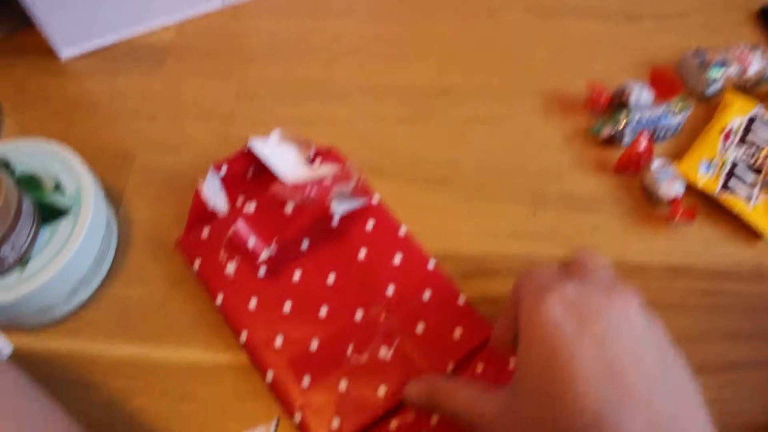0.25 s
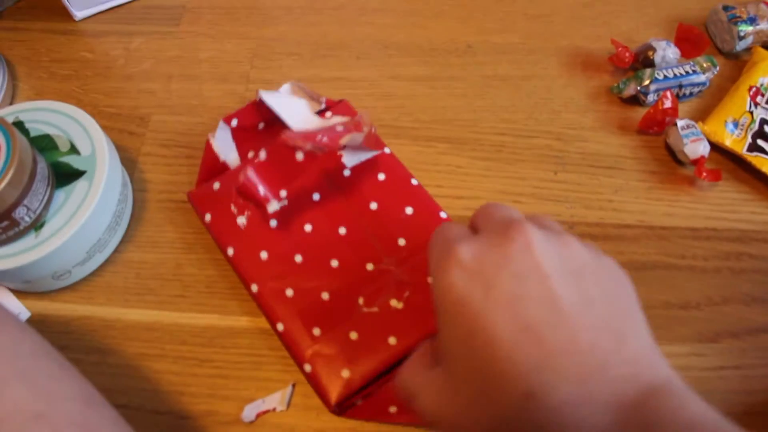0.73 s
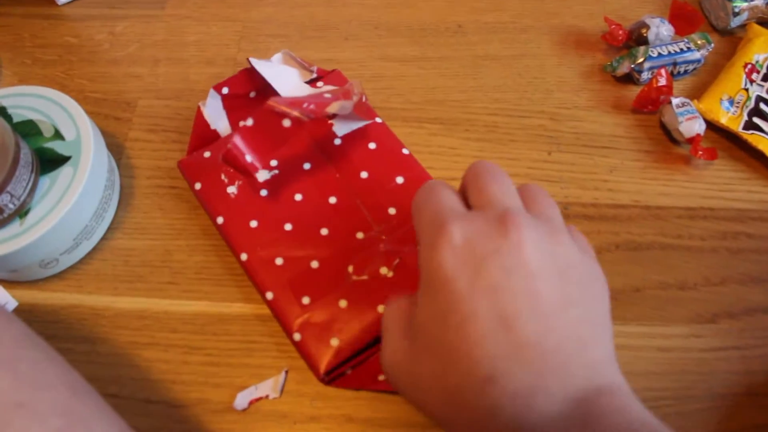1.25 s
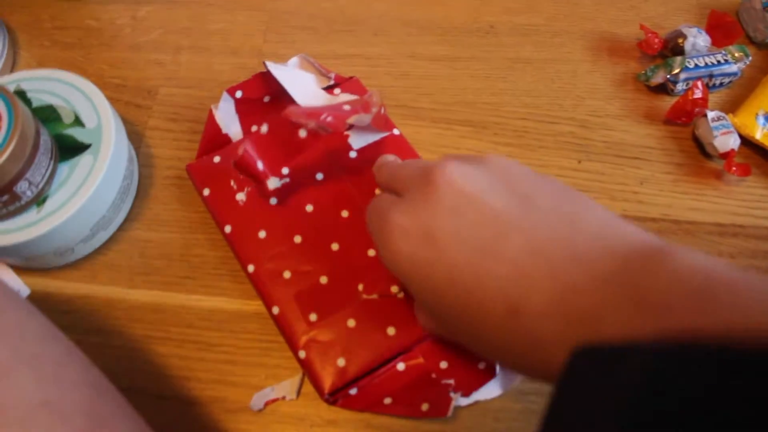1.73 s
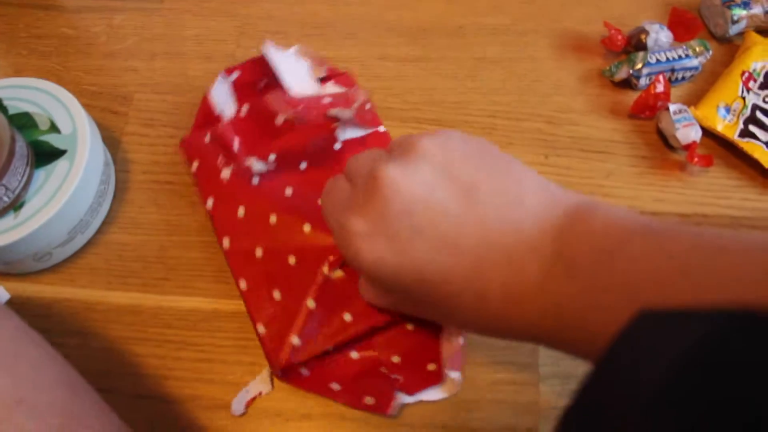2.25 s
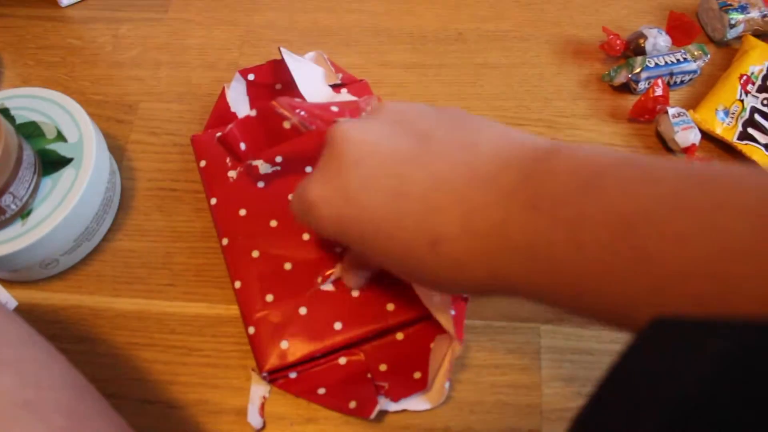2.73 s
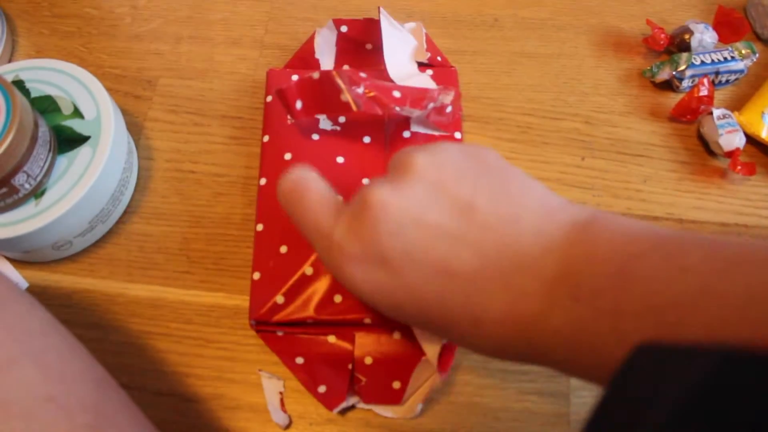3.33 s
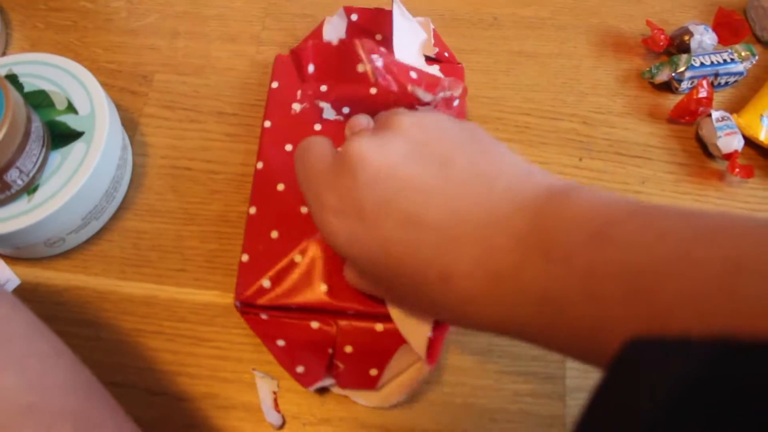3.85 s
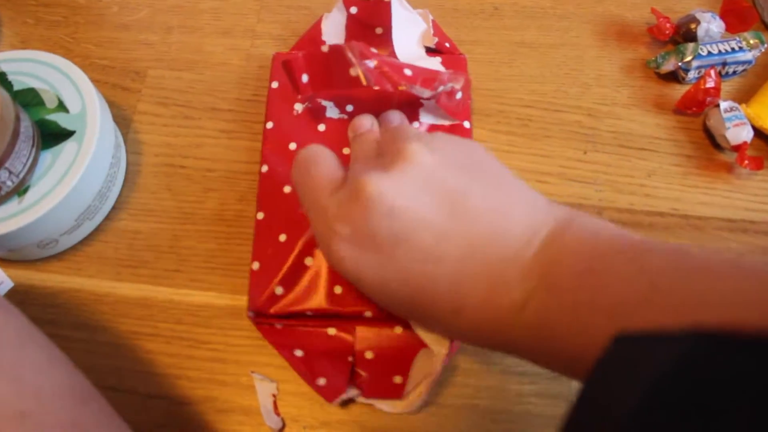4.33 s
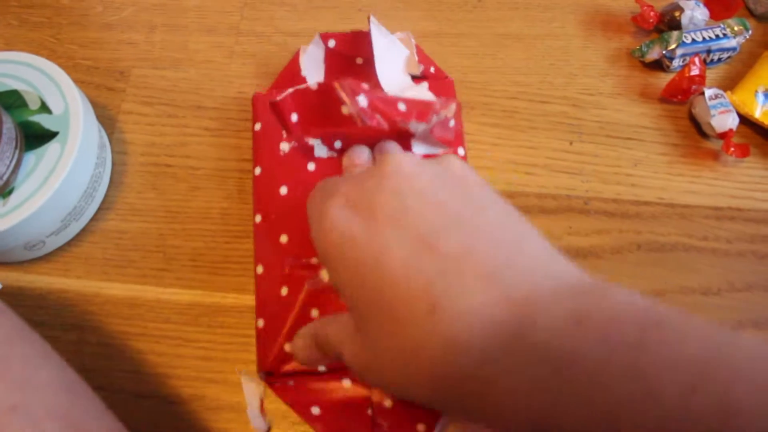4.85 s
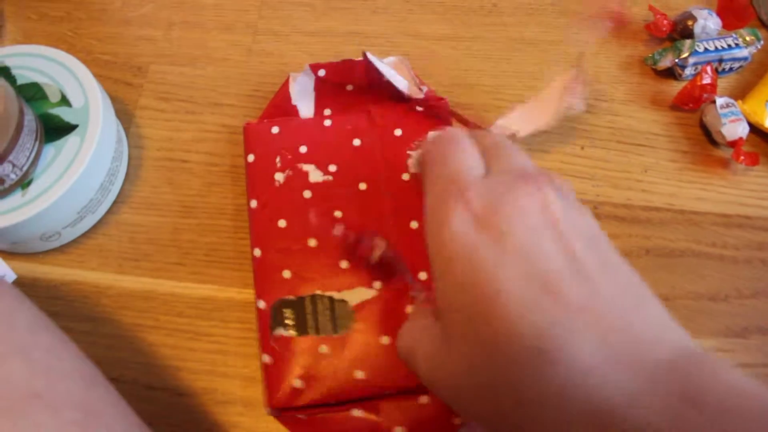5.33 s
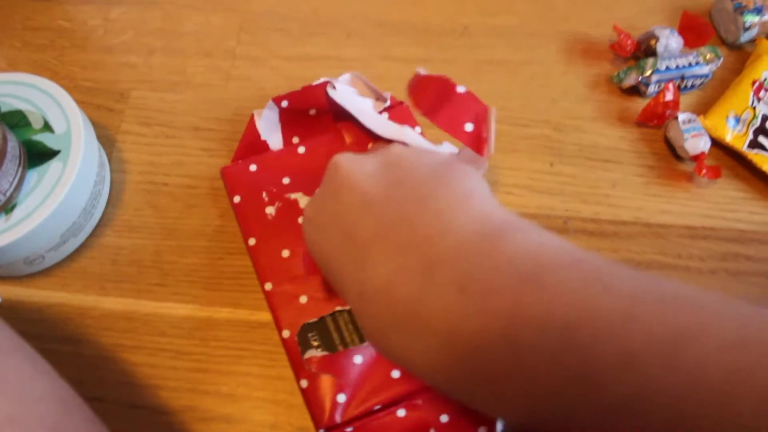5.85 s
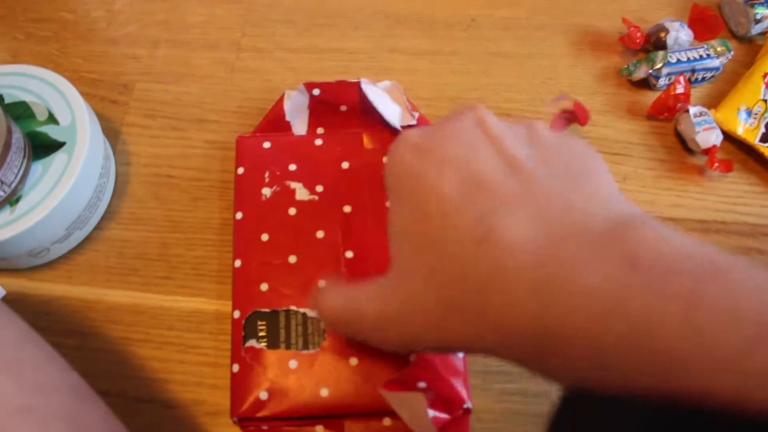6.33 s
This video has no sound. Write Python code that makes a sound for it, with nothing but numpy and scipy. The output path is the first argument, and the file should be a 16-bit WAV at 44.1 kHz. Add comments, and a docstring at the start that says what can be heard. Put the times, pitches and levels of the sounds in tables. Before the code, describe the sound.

Thin wrapping paper crinkles, snaps and tears as a hand unwraps a small box, close by over a faint low hum.

```python
"""Unwrapping a small box

A hand picks at, crinkles and tears thin wrapping paper round a small box on a wooden floor, close by.
Creases snap and knock the box; fingers rustle and drag over the sheet. A small furnished room
answers after a short gap, over air noise and a faint wavering hum.
The loudest snaps carry a short low thump and overload the input."""
import sys
import numpy as np
from scipy import signal
from scipy.fft import rfft, irfft, next_fast_len
from scipy.io import wavfile
from scipy.ndimage import uniform_filter1d, map_coordinates

SR = 44100
rng = np.random.default_rng(int(sys.argv[2]) if len(sys.argv) > 2 else 0)


def to_wav(sig):
    """Store sig (one row per channel, or 1-D mono) as 16-bit WAV at the path in sys.argv[1].

    Samples outside -1..1 are clipped; the rate is SR.
    """
    pcm = np.clip(np.atleast_2d(sig), -1, 1) * 32767
    pcm = np.round(pcm).astype(np.int16)
    wavfile.write(sys.argv[1], SR, pcm.T)  # frames by channels


N = 290178


def amp(db):
    return 10 ** (np.asarray(db) / 20)


def unit_rms(x):
    return x / np.sqrt(np.mean(x ** 2) + 1e-20)


def along(points, hz):
    """Interpolate (freq_hz, value) points on a log axis."""
    freq_hz, values = np.transpose(points)
    return np.interp(np.log(hz + 1), np.log(freq_hz + 1), values)


def curve(points):
    """Interpolate (time_s, value) points to one value per sample."""
    time_s, values = np.transpose(points)
    return np.interp(np.arange(N) / SR, time_s, values)


def wobble(rate_hz):
    """Smooth random curve with rate_hz knots a second."""
    knots = rng.standard_normal(int(N * rate_hz / SR) + 4)
    return map_coordinates(knots, [np.arange(N) * rate_hz / SR])


def filtered(x, response):
    """Apply a complex frequency response."""
    n = x.shape[-1]
    size = next_fast_len(n + 4096)
    return irfft(rfft(x, size) * response(np.fft.rfftfreq(size, 1 / SR)), size)[..., :n]


def mode(f, hz, width_hz):
    """Causal resonance of height 1."""
    return 1j * f * width_hz / (hz * hz - f * f + 1j * f * width_hz)


def spread(pair, correlation):
    """Mix two unrelated signals to left and right, following (freq_hz, correlation) points."""
    angle = lambda f: np.arccos(np.clip(along(correlation, f), -1, 1)) / 2
    mid, side = filtered(pair, lambda f: np.array([np.cos(angle(f)), np.sin(angle(f))]))
    return np.array([mid + side, mid - side])


# Air noise spectrum: freq_hz, density_db
AIR_SPECTRUM = [(15, -51), (25, -13), (148, -2.5), (253, -6.5), (411, -3.5), (599, -7.5), (1380, -11),
                (1710, -14), (2630, -12), (8380, -16.5), (15600, -17.5)]
# Hum envelope: time_s, level_db
HUM_LEVELS = [(0.0, -61), (0.73, -59.5), (1.02, -56.5), (1.34, -64.5), (4.21, -65), (4.31, -59),
              (6.16, -66), (6.58, -60)]


def room_tone():
    """Steady air noise and a narrow, wavering hum."""
    air = filtered(rng.standard_normal((2, N)), lambda f: amp(along(AIR_SPECTRUM, f)))
    air = spread(air, correlation=[(50, 0.15), (300, 0.067), (3000, 0.063), (14000, 0.34)])
    hum = filtered(rng.standard_normal(N), lambda f: mode(f, hz=145, width_hz=10) ** 2)
    return amp(-51) * unit_rms(air) + amp(curve(HUM_LEVELS)) * unit_rms(hum)


# Room decay: freq_hz, t60_s
ROOM_DECAY = [(200, 0.19), (1500, 0.22), (5000, 0.21), (14000, 0.14)]


def room_echo(x):
    """Walls answer after a short gap; the hand moves, so each block meets a new tail."""
    out = np.zeros((2, N + 2 * SR))
    block, gap_s, build_s = 8192, 0.0105, 0.00033
    for start in range(0, N, block):
        hz, t, spectrum = signal.stft(rng.standard_normal((2, SR // 3)), SR, nperseg=256)
        decay = amp(-60 * t / along(ROOM_DECAY, hz)[:, None])
        tail = signal.istft(spectrum * decay, SR, nperseg=256)[1]
        tail *= 1 - np.exp(-np.arange(tail.shape[1]) / (build_s * SR))
        tail = spread(tail, correlation=[(200, 1.0), (2000, 0.71), (12000, 0.1)])
        mono = x[:, start:start + block].mean(0)
        wet = signal.fftconvolve(mono[None], tail / np.linalg.norm(tail[0]), axes=1)
        out[:, start + round(gap_s * SR):][:, :wet.shape[1]] += wet
    return out[:, :N]


# Low thumps: start_s, level_db
THUMPS = [(4.41, -36), (5.04, -22), (6.068, -36)]


def thumps():
    """Short low thumps under the loudest snaps, one pulse each."""
    out = np.zeros(N + SR)
    decay_s = 0.0011
    age = np.arange(4096) / (decay_s * SR)
    pulse = age * (2 - age) * np.exp(-age)
    for start_s, level_db in THUMPS:
        out[round(start_s * SR):][:len(pulse)] += amp(level_db) * pulse
    return out[:N]


# Box resonances: pitch_hz, width_hz, gain_db
BOX_MODES = [(321.5, 264, -2), (393, 169.4, 3)]


def box_ring(f):
    """Response of the hollow parcel: broad modes of alternating sign."""
    return sum((-1) ** k * amp(gain_db) * mode(f, pitch_hz, width_hz)
               for k, (pitch_hz, width_hz, gain_db) in enumerate(BOX_MODES))


# Left-right likeness of close sounds: freq_hz, correlation
NEAR_CORRELATION = [(60, 0.97), (250, 1), (2000, 0.88), (6000, 0.79), (15000, 0.31)]


def near_noise(envelope):
    """Shaped stereo noise from close by, widest in the treble."""
    return spread(rng.standard_normal((2, len(envelope))) * envelope, NEAR_CORRELATION)


def crackle(rate_hz, scatter_db, smooth_share, clump_db):
    """Noise in short, clumped grains of very uneven size over a smooth share."""
    decay_s = 0.0025
    onsets = rng.random(N) < rate_hz / SR
    sizes = amp(scatter_db * np.minimum(rng.exponential(size=N), 3.5))
    grains = signal.lfilter([1], [1, -np.exp(-1 / (decay_s * SR))], onsets * sizes)
    clumps = amp(clump_db * wobble(rate_hz=40))
    return near_noise((unit_rms(grains) + smooth_share) * clumps)


def levelled(x):
    """Hold the half-second rms at 1."""
    power = uniform_filter1d(x.mean(0) ** 2, size=SR // 2)
    return x / np.sqrt(np.abs(power) + 1e-12)


# Thin coated paper: freq_hz, density_db
SHEET_SPECTRUM = [(350, -62), (600, -4), (767, 8.5), (1810, 1), (2720, 7), (3990, -5), (5090, 2.5),
                  (8900, -2.5), (12900, 0.5), (15600, -36)]
# Sheet creasing under the hand: time_s, level_db
RUSTLE_LEVELS = [(0.0, -62), (0.13, -55), (0.31, -58), (1.34, -50), (1.47, -43), (1.61, -49), (2.18, -46),
                 (2.29, -40), (2.44, -49.5), (2.62, -53), (2.91, -55), (3.11, -38), (3.26, -49.5),
                 (3.43, -56), (3.94, -44.5), (4.23, -37), (4.53, -35.5), (4.71, -49), (5.48, -40),
                 (5.61, -47.5), (5.88, -54), (6.17, -37), (6.3, -49), (6.58, -51.5)]


def rustle():
    """Small creases keep settling; one crackle shakes the sheet and the box under it."""
    sheet_db = curve(RUSTLE_LEVELS)
    box_db = -59 + 0.7 * (sheet_db + 49)  # the box swings less than the sheet
    grains = crackle(rate_hz=250, scatter_db=4, smooth_share=0.8, clump_db=3)
    sheet = filtered(grains, lambda f: amp(along(SHEET_SPECTRUM, f)))
    box = filtered(grains, box_ring)
    return amp(sheet_db) * levelled(sheet) + amp(box_db) * levelled(box)


def paper(drive, edge_drive, pitch_hz, treble_db, width_ratio, broad_db):
    """The moving patch rings at its own pitch, over the sheet's broad voice and a bright edge."""
    ring = lambda f: mode(f, pitch_hz, width_ratio * pitch_hz)
    broad = lambda f: mode(f, hz=2530, width_hz=6000) ** 2
    patch = filtered(drive, lambda f: ring(f) + amp(broad_db) * broad(f))
    edge = filtered(edge_drive, lambda f: mode(f, hz=8230, width_hz=5260) ** 2)
    return unit_rms(patch) + amp(treble_db) * unit_rms(edge)


def friction(rows, treble_db, width_ratio, broad_db):
    """Fine-grained hiss that swells and fades with each slide or rip."""
    out = np.zeros((2, N + SR))
    pad, rise_share = 8192, 0.51
    t = np.arange(-pad, pad) / SR
    fibres = crackle(rate_hz=900, scatter_db=3, smooth_share=0.57, clump_db=4)
    fibres = np.pad(fibres, ((0, 0), (pad, pad)), "reflect")
    for crest_s, level_db, pitch_hz, length_ms in rows:
        sigma_s = length_ms / 1000 * np.where(t < 0, rise_share, 1 - rise_share)
        swell = np.exp(-0.5 * (t / sigma_s) ** 2)
        span = slice(round(crest_s * SR), round(crest_s * SR) + len(t))
        rub = swell * fibres[:, span]
        hiss = paper(rub, rub, pitch_hz, treble_db, width_ratio, broad_db)
        out[:, span] += amp(level_db) * hiss * np.linalg.norm(swell) / np.linalg.norm(hiss.mean(0))
    return out[:, pad:N + pad]


# Singing drags: crest_s, level_db, pitch_hz, length_ms
DRAGS = [(2.58, -45.5, 1320, 136), (2.76, -52, 1350, 73), (4.095, -28, 5050, 29), (4.097, -35, 6500, 27),
         (4.33, -43.5, 232, 100), (4.66, -38.5, 1220, 53), (5.11, -48, 190, 70), (6.09, -45.5, 230, 60)]


def drags():
    """The parcel on the floor, or a nail on the sheet, sings at one narrow pitch."""
    return friction(DRAGS, treble_db=-25, width_ratio=0.13, broad_db=-24)


# Strokes and rips: crest_s, level_db, pitch_hz, length_ms
STROKES = [(0.045, -40, 2520, 43), (0.133, -35.5, 980, 43), (0.289, -45.5, 600, 10),
           (0.399, -31.5, 3220, 25), (0.541, -42.5, 2500.0, 18), (0.581, -33.5, 3800, 25),
           (0.707, -36.5, 4130.0, 23), (0.831, -40, 4230, 49), (0.967, -37, 3070.0, 20.6),
           (1.104, -25, 4600.0, 17.3), (1.387, -28.5, 3960.0, 63), (1.62, -40, 2960.0, 56),
           (1.79, -54, 2960, 45), (2.562, -34.5, 2230, 29), (2.651, -41, 5150.0, 56),
           (2.824, -47.5, 4900, 98), (2.948, -40, 1350.0, 25.0), (3.05, -46, 3970.0, 29),
           (3.191, -43.5, 4230, 110), (3.36, -47.0, 1840, 13), (3.446, -45.5, 2040.0, 25),
           (3.6, -39, 2780, 60), (4.1, -26, 5200.0, 52), (4.317, -42, 3770.0, 190),
           (4.527, -31, 3300.0, 43), (4.605, -31, 2870.0, 30), (4.966, -35, 2920, 107),
           (5.213, -47, 3680, 26), (5.313, -36, 2870, 65.0), (5.427, -37, 4070, 75), (5.529, -35, 3530, 59),
           (5.675, -43.5, 3560, 41), (5.85, -40.5, 5360, 34), (6.035, -24.5, 4560, 42),
           (6.074, -25.5, 3900, 23.5), (6.169, -29, 4450, 43), (6.287, -34, 1380, 33),
           (6.334, -40, 5470, 69.0), (6.478, -46.5, 2800.0, 120), (6.573, -37, 4170, 56)]


def strokes():
    """Soft strokes and rips: fibres part too fast to tell apart."""
    return friction(STROKES, treble_db=-8.5, width_ratio=0.53, broad_db=-4)


# Creases and fibres letting go: start_s, level_db, pitch_hz, knock_db, hold_ms
SNAPS = [(0.143, -28.5, 1730, -9, 2.4), (0.3044, -13.0, 3560, -16, 1.9), (0.401, -29.5, 2710.0, -5, 1.9),
         (0.4047, -26, 1510, -4, 1.9), (0.6522, -25.5, 2720, -7, 3.6), (0.9003, -39.5, 3250.0, -14, 8.2),
         (1.0648, -37, 2650, -7.5, 6.1), (1.092, -26, 4700, -11, 5.4), (1.25, -29, 3920, -33, 3.1),
         (1.3254, -18.5, 3100.0, -9.5, 2.9), (1.3593, -28, 1860, -11, 2.8), (1.3736, -22, 5000, -6, 1.6),
         (1.4021, -15, 1760, -15, 5.3), (1.5206, -17.5, 2600.0, -19.5, 2.8), (1.6235, -35.5, 3190.0, -2, 3),
         (1.7508, -24.5, 2200.0, -19, 1.3), (1.8426, -15.5, 5500, -18, 3.5),
         (1.8624, -25.5, 5700, -17.5, 4.7), (1.9168, -26, 5300, -37, 1.9),
         (1.9398, -33, 8260.0, -30.0, 2.5), (1.9542, -21.5, 3800, -16, 1.5),
         (1.988, -25.5, 4300.0, -30.0, 1.7), (2.003, -24.5, 2240, -18.5, 1.3),
         (2.0418, -31, 760.0, -6, 2.3), (2.0877, -34, 1000.0, 4, 1.8), (2.1108, -25.5, 926.0, 14.5, 2.2),
         (2.1493, -23, 855, -6, 1.4), (2.1967, -29.5, 3080.0, -8.5, 1.4), (2.2186, -18, 2730, -40, 2.3),
         (2.2251, -17.5, 3100, -30.0, 1.3), (2.258, -29, 1330, -9, 2.1), (2.2988, -9.5, 4650, -31, 0.75),
         (2.3166, -26, 3680.0, -23, 1.4), (2.3654, -14.5, 3860, -15.5, 2.05),
         (2.4533, -34.5, 710.0, 16.5, 1.3), (2.4811, -32.5, 1310, -2.5, 2.8),
         (2.5232, -27.5, 3900, -7, 1.8), (2.5468, -31.5, 2250, -11, 4.7),
         (2.8728, -39.5, 1250.0, 13.5, 2.5), (2.9616, -17.0, 4930, -11, 2.05),
         (2.9727, -18.5, 4830, -6, 1.9), (2.9804, -28, 1160.0, -13, 5.9), (3.0222, -20.0, 8100.0, -10, 1.3),
         (3.0734, -16, 3800, -17, 2), (3.1066, -18, 1400, -7.5, 1.1), (3.4636, -37.5, 2200.0, -22, 2.5),
         (3.4946, -12, 2940, -21.5, 1.9), (3.5822, -32, 790, -10, 7.2), (3.608, -32, 5200, -1, 3.6),
         (3.6334, -33, 860, -14, 3.4), (3.7445, -26, 1470.0, -20, 2.8), (3.8354, -36.0, 2040.0, -6, 6.9),
         (3.8496, -18, 2620.0, -26, 2.3), (3.8848, -19, 2550, -13, 1.7), (3.8934, -18.5, 2400, -16, 1.3),
         (3.906, -24, 2520, -9, 1.3), (3.9348, -22.5, 3530, -36, 1.5), (4.0364, -14, 2000, -19.5, 2.1),
         (4.0775, -15.5, 1310, -21, 1.5), (4.1127, -23.5, 1530, -12, 2.6), (4.1375, -21, 7300, -30.0, 1.4),
         (4.1702, -13, 6660, -42, 1.2), (4.1975, -12, 1740, -13, 1.8), (4.2386, -24.0, 3800.0, -30.0, 1.0),
         (4.2523, -21, 3760, -13, 1.8), (4.264, -29.5, 2150.0, -2, 6.8), (4.2733, -20, 3900, -14, 1.7),
         (4.2932, -17, 3900, -10.5, 1.6), (4.3316, -17.5, 2790, -15.5, 3.9),
         (4.3551, -13, 5400, -13.5, 1.7), (4.3767, -17, 1390.0, -8, 1.8),
         (4.3949, -23.5, 3710.0, -5.5, 2.4), (4.4084, -5, 3700, -24.5, 2.4),
         (4.4728, -23, 2110.0, -37, 1.4), (4.5006, -20, 3680, -36, 2.9), (4.5254, -18, 2470, -21, 1.9),
         (4.5778, -23, 2290.0, -28, 1.8), (4.597, -13.5, 1960.0, -11, 1.4), (4.6188, -21.5, 8950, -27, 2.1),
         (4.6431, -16.5, 1260, -13, 0.84), (4.6909, -16, 2770, -16, 2.3), (4.8719, -30.5, 2220, -17, 3.2),
         (4.9015, -25, 8150, -28, 1.6), (4.9544, -18.5, 2590, -8, 0.88), (4.9928, -17, 2940.0, -16.5, 1.5),
         (5.0035, -17, 3000.0, -32, 1.2), (5.024, -21.0, 2020.0, -21, 3.2),
         (5.0343, -9.5, 8100, -17.5, 4.2), (5.0388, -5.0, 3280, -37, 1.5), (5.2126, -30.5, 3680, -5, 1.6),
         (5.2887, -37, 2980.0, -4, 2.5), (5.4413, -20.5, 2610, -14, 1.4), (5.511, -23.0, 2250, -18, 3.7),
         (5.5479, -14.0, 5640, -12.5, 2.2), (5.766, -28.5, 3630, -20, 1.7),
         (5.8154, -27.0, 2130, -30.0, 1.7), (5.8355, -32, 5490.0, -15.5, 4.8),
         (5.8706, -27.5, 7200.0, -19, 2), (5.9925, -27.5, 2220, -22, 3.3), (6.0689, -8.5, 5200, -18, 2.8),
         (6.08, -8.5, 3060, -29, 2.7), (6.0916, -25.5, 3020.0, -6.5, 1.5), (6.1407, -21.5, 4670, -25, 2.7),
         (6.1693, -25.5, 4470.0, -13, 1.9), (6.1983, -21, 4440, -27.5, 1.7),
         (6.2124, -25.5, 4370.0, -30.0, 2.5), (6.3242, -32.5, 5800, -16.5, 5.2),
         (6.4785, -33, 3280, -33, 1.6), (6.4878, -29, 2210.0, -32, 2.9), (6.5328, -35.5, 4260.0, -11, 4.3)]


def snaps():
    """Each crease lets go as a few ms of spiky cracks that also knock the box."""
    out = np.zeros((2, N + SR))
    t = np.arange(2048) / SR
    edge_t60_s = 0.0068  # the highest tones die first
    for start_s, level_db, pitch_hz, knock_db, hold_ms in SNAPS:
        hold_s = hold_ms / 1000
        attack = 1 - np.exp(-t / (0.17 * hold_s))
        envelope = attack * amp(-60 * np.maximum(t - hold_s, 0) / (0.013 + 3 * hold_s))
        slips = amp(3.73 * rng.standard_normal(len(t) // 4)).repeat(4)
        cracks = near_noise(envelope * slips)
        edge_drive = cracks * amp(-60 * t / edge_t60_s)
        treble_db = -10.5 + 4 * rng.standard_normal()
        snap = paper(cracks, edge_drive, pitch_hz, treble_db, width_ratio=0.37, broad_db=-6.5)
        snap += amp(knock_db) * unit_rms(filtered(cracks, box_ring))
        snap *= np.linalg.norm(envelope) / np.linalg.norm(snap.mean(0))
        out[:, round(start_s * SR):][:, :len(t)] += amp(level_db) * snap
    return out[:, :N]


def scene():
    """Paper slightly to the left, its echo and the room tone."""
    snapping = snaps()
    rubbing = strokes() + rustle() + drags()
    pan_db = [[0.4], [-0.4]]
    direct = (snapping + rubbing + thumps()) * amp(pan_db)
    echo = room_echo(amp(-11.5) * snapping + amp(-12.5) * rubbing)
    return direct + echo + room_tone()


# Microphone response: freq_hz, gain_db
MIC_RESPONSE = [(20, -3), (100, -1), (7000, 1), (11000, -6), (15700, -9)]


def record(dry):
    """A microphone dull at the top feeds a saturating, band-limited input."""
    ceiling, cutoff_hz = 1.02, 15720
    heard = filtered(dry, lambda f: amp(along(MIC_RESPONSE, f)))
    clipped = heard / (1 + np.abs(heard / ceiling) ** 8) ** (1 / 8)
    return filtered(clipped, lambda f: f < cutoff_hz)


dry = scene()
out = record(dry)
to_wav(out)
```